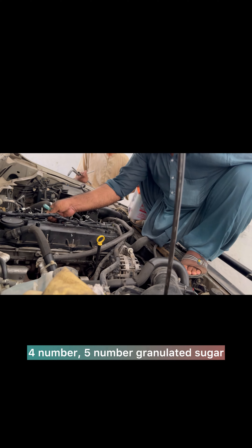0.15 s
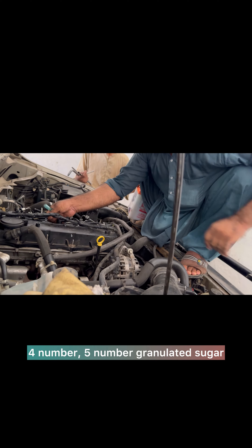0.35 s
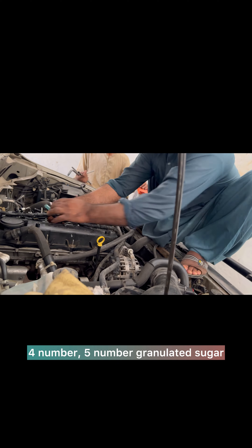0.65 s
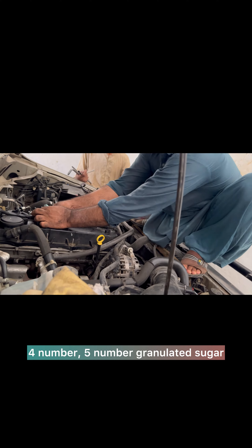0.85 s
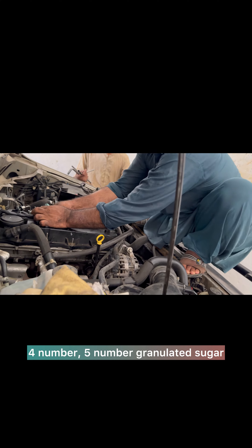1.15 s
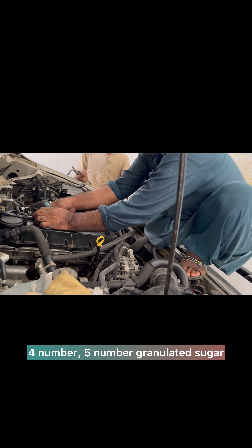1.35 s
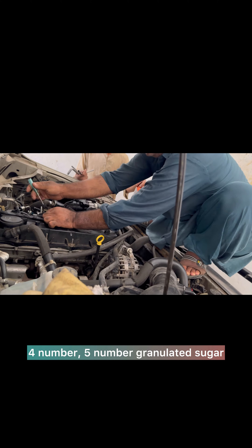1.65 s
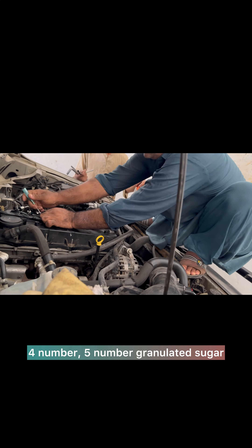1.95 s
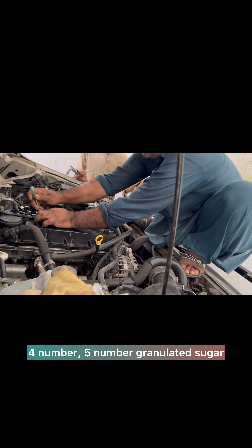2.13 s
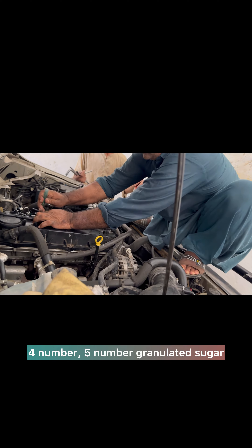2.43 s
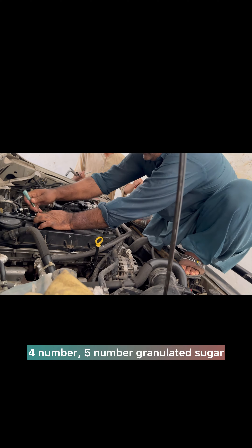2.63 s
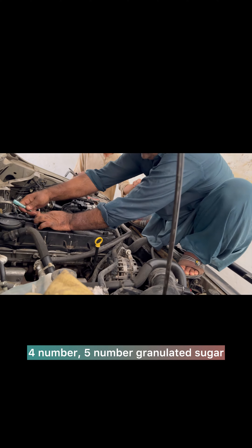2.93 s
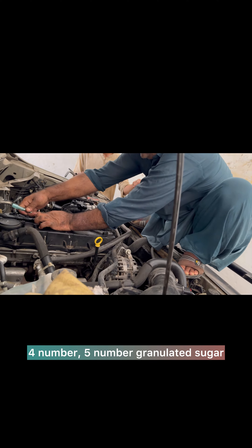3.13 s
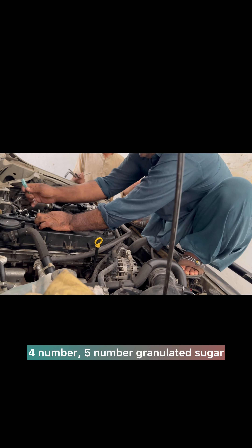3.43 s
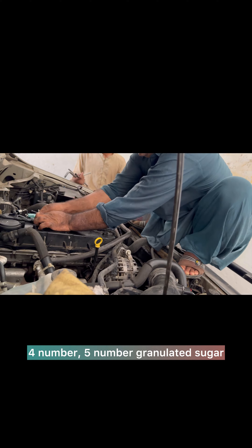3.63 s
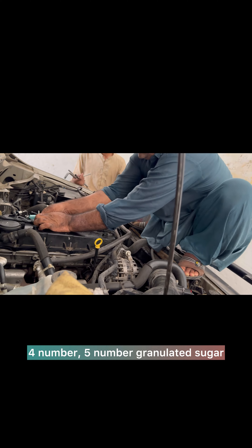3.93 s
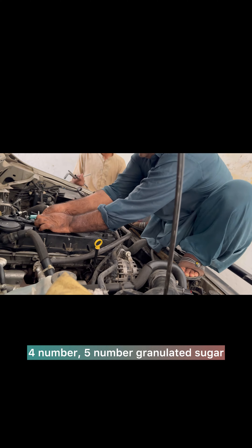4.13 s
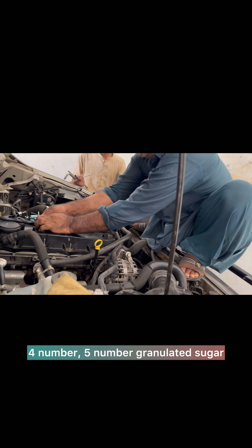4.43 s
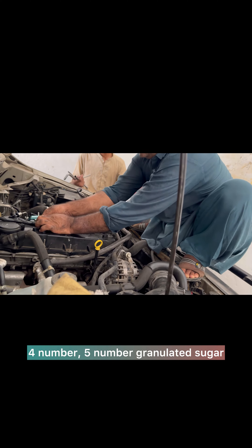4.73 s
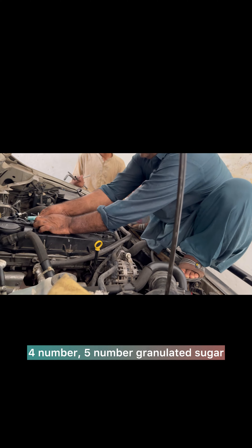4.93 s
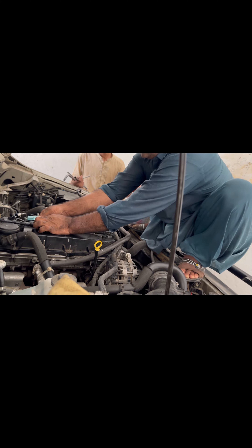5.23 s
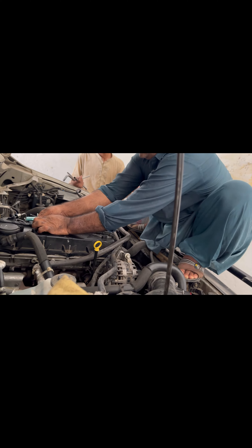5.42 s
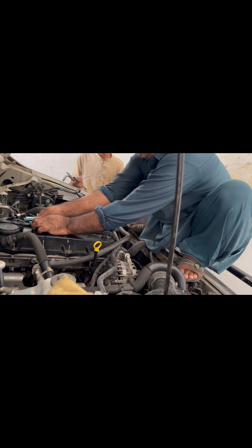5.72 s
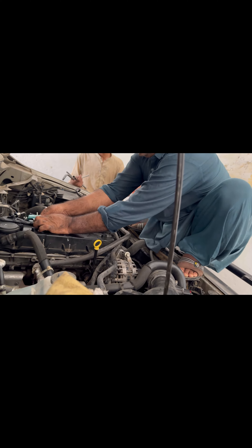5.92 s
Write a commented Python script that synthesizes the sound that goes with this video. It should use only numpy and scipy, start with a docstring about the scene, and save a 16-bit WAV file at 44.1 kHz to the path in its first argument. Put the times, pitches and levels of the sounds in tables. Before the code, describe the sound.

A diesel engine idles with a limping, uneven clatter close by, metal knocks and valve ticks over a low exhaust throb and steady fan roar.

```python
"""Under an open bonnet, close to a small stereo microphone, a diesel engine idles.
Five blows in each crank turn ring its metal parts; the last is the heaviest, so the idle limps,
and a valve ticks loudest in the blow before it. Exhaust puffs give the low throb, fan and intake roar,
gears tap much alike from turn to turn, belt-driven tones hum on their own pitches and a low hoot comes and goes."""
import sys
import numpy as np
from scipy import signal
from scipy.fft import rfft, irfft, next_fast_len
from scipy.io import wavfile
from scipy.ndimage import uniform_filter1d

SR = 44100
rng = np.random.default_rng(int(sys.argv[2]) if len(sys.argv) > 2 else 0)


def wav_record(signal):
    """Record a signal, one row per channel, as 16-bit PCM in the file named by sys.argv[1]."""
    frames = np.transpose(np.atleast_2d(signal))
    bounded = np.clip(frames, -1, 1)
    # unit amplitude maps onto the largest positive 16-bit level
    quanta = np.round(bounded * 32767).astype(np.int16)
    wavfile.write(sys.argv[1], SR, quanta)


def gain_from_db(level_db):
    """Convert decibel levels to linear amplitude factors (20 dB per decade)."""
    decades = np.asarray(level_db, float) / 20
    return 10 ** decades


N = 267687
TURNS_PER_S = 11.39  # steady crank speed
MAX_TURNS = 71  # enough to cover the whole scene


def read(points, hz, column=1):
    """Reads a curve against pitch, with straight lines on a log pitch scale."""
    table = np.array(points)
    return np.interp(np.log(hz + 1), np.log(table[:, 0] + 1), table[:, column])


def evened(x):
    """Scales to rms 1."""
    return x / np.sqrt(np.mean(abs(x) ** 2))


def add(mix, start_s, sound):
    """Lays a sound into the mix, cut off at its end."""
    part = mix[round(start_s * SR):][:len(sound)]
    part += sound[:len(part)]


def wander(hz):
    """Slow random drift of rms 1: low-passed noise on 40 knots a second, joined by straight lines."""
    knots = rng.standard_normal(round(N / SR * 40) + 82)
    lowpass = signal.butter(1, np.clip(hz / 20, .01, .9))
    smooth = signal.filtfilt(*lowpass, knots)[40:-40]
    return np.interp(np.arange(N), np.linspace(0, N, len(smooth)), evened(smooth))


# how far the crank runs ahead of a steady speed: time_s [s], lead_ms [ms]
CRANK_LEAD = [(0, 8.4), (.22, 3.9), (.39, 2.2), (.57, 1.35), (.92, 1.7), (1.27, 2.1), (1.71, 2.9),
              (2.15, 3.2), (2.41, 3.1), (2.68, 2.4), (3.38, 1.0), (3.99, 1.3), (4.43, 1.1), (4.78, 1.5),
              (5.13, 2.6), (5.57, 4.9), (6.07, 8.7)]


def crank():
    """Turns completed at each sample: a steady speed plus a drifting lead, which bends all engine pitches."""
    t = np.arange(N) / SR
    time_s, lead_ms = np.transpose(CRANK_LEAD)
    return TURNS_PER_S * (t + np.interp(t, time_s, lead_ms) / 1000)


# colour of the fan and intake noise: pitch_hz [Hz], relative_level_db [dB per Hz]
ROAR_COLOUR = [(45, 3.5), (80, 4.5), (130, 7.5), (170, 6), (212, 6.5), (330, 5), (500, 4.5), (800, 3.5),
               (1400, 0.5), (2000, -2), (2600, 2.5), (3100, 0.5), (3600, -3), (4200, -1), (4800, -10),
               (5400, -0.5), (6500, -3), (8500, -4), (10500, -9.5), (15600, -13.5)]


def roar(level_db=-43.5, patchy_db=1.47):
    """Fan and intake noise from many places at once: two unrelated streams, patchy in time and pitch."""
    frames, hz = N // 256 + 7, np.fft.rfftfreq(1024, 1 / SR)
    real_1, imag_1, real_2, imag_2, patches = rng.standard_normal((frames, 513, 5)).T
    patches = uniform_filter1d(patches, size=10, axis=0)
    patches = evened(uniform_filter1d(patches, size=10, axis=1))
    colour = gain_from_db(read(ROAR_COLOUR, hz)[:, None] + patchy_db * patches)
    spectra = np.array([real_1 + 1j * imag_1, real_2 + 1j * imag_2]) * colour
    noise = signal.istft(spectra, nperseg=1024, noverlap=768)[1][:, 512:N + 512]
    return gain_from_db(level_db) * evened(noise)


# colour of the gear, chain and tappet taps: pitch_hz [Hz], relative_level_db [dB per Hz]
RATTLE_COLOUR = [(250, -36), (420, 6.5), (520, 3), (800, 8), (900, 1), (1400, 4.5), (2000, 3.5),
                 (2600, 6.5), (3100, 6.5), (3600, -7), (4300, -5), (5500, -12), (6500, -25)]
# share of the rattle's power that slowly changes its pattern: pitch_hz [Hz], power_share [0-1]
PATTERN_DRIFT = [(800, .1), (1500, .35), (2200, .6), (3000, .85)]


def rattle(turns, patterns=6, size=32768, level_db=-44, taps_per_turn=90, spread_db=4, lag_turns=.13):
    """Gears, chain and tappets: one turn of random taps goes round and round while others fade over it."""
    taps = np.zeros((patterns, 2, size))
    shape = (patterns, 2, taps_per_turn)
    signs = rng.choice([-1, 1], shape)
    strikes = signs * gain_from_db(spread_db * np.minimum(rng.exponential(1, shape), 3))
    # taps crowd in after each blow and thin out towards the next
    blow_place = np.array(BLOWS)[:, 0]
    places = rng.choice(blow_place, shape) + rng.exponential(lag_turns, shape)
    np.put_along_axis(taps, (places % 1 * size).astype(int), strikes, 2)

    hz = np.arange(700) * TURNS_PER_S  # harmonics of one turn
    drift = read(PATTERN_DRIFT, hz)
    share = np.sqrt([1 - drift] + [drift] * (patterns - 1))[:, None]
    loops = irfft(rfft(taps)[..., :len(hz)] * share * gain_from_db(read(RATTLE_COLOUR, hz)), size)

    fading = np.array([wander(.5) for _ in range(patterns - 1)])
    weights = [1, *fading / np.linalg.norm(fading, axis=0)]
    place = turns % 1 * size
    out = np.zeros((2, N))
    for weight, loop in zip(weights, loops):
        for port in range(2):
            out[port] += weight * np.interp(place, np.arange(size), loop[port])
    return gain_from_db(level_db) * evened(out)


def pant(turns, fade_db=0.5, limp_db=1.5):
    """Gain curve with five even swells a turn, on top of one broad swell around the heavy blow."""
    since = (5 * turns - .45) % 1  # share of a beat gone since the last swell
    return gain_from_db(-fade_db * since + limp_db * np.cos(2 * np.pi * (turns - .98)))


# faint low hoots: start_s [s], length_s [s], pitch_hz [Hz], level_db [dB rms]
HOOTS = [(3.096, 0.34, 587, -53), (4.002, 0.25, 578, -54.5), (4.701, 0.28, 592, -52.5),
         (5.556, 0.2, 585, -54)]


def hoots():
    """Faint steady sines that fade in and out."""
    out = np.zeros(N)
    for start_s, length_s, pitch_hz, level_db in HOOTS:
        t = np.arange(0, length_s, 1 / SR)
        tone = np.sin(2 * np.pi * pitch_hz * t) * signal.windows.tukey(len(t), .6)
        add(out, start_s, gain_from_db(level_db) * tone)
    return np.sqrt(2) * out


# belt-driven tones: pitch_hz [Hz at steady speed], level_db [dB rms before its slow waver]
HUMS = [(199.3, -58), (327, -53.5), (420.3, -61), (560.2, -60), (653.7, -59.5), (748, -60), (1873, -58)]


def hums(turns):
    """Belt-driven sines whose pitch follows the engine speed, wavering a little in level and phase."""
    engine_s, out = turns / TURNS_PER_S, np.zeros(N)
    for pitch_hz, level_db in HUMS:
        phase = 2 * np.pi * pitch_hz * engine_s + 0.25 * wander(1.0)
        out += gain_from_db(level_db + 1.2 * wander(1.5)) * np.sin(phase)
    return np.sqrt(2) * out


# lines of the exhaust throb: multiple [of the crank rate], level_db [dB rms before its slow waver]
THROB_LINES = [(4, -79), (5, -46.5), (6, -64.5), (9, -61.5), (10, -63), (11, -80), (12, -72.5), (13, -61),
               (14, -64.5), (15, -50), (16, -54), (17, -69), (20, -55), (21, -59.5), (22, -69), (23, -85),
               (24, -59.5), (26, -59), (27, -77), (28, -61.5), (29, -75.5), (30, -53.5), (31, -56),
               (32, -76), (33, -57.5), (34, -72.5), (35, -64.5), (36, -66), (39, -74), (44, -64.5),
               (47, -60), (62, -74), (68, -68.5), (72, -59), (73, -70.5), (83, -63.5), (92, -74.5),
               (96, -57.5), (99, -61.5)]
# uneven exhaust puffs in one turn, which set how the lines start:
# place_turns [turns], strength_db [dB at multiple 16], brightness_db [dB per octave]
PUFFS = [(0.0, -5.1, 12), (.188, .6, 5.2), (.407, -7.4, 5.3), (.448, -.5, -1.6), (.776, 3.5, 2.9),
         (.864, .6, -3.8)]


def throb(turns, waver_db=0.12):
    """Exhaust: sines at multiples of the crank rate, lined up in phase as the uneven puffs set them."""
    place_turns, strength_db, brightness_db = np.transpose(PUFFS)
    out = np.zeros(N)
    for multiple, level_db in THROB_LINES:
        puffs = gain_from_db(strength_db + brightness_db * np.log2(multiple / 16))
        start = np.angle(np.sum(puffs * np.exp(-2j * np.pi * multiple * place_turns))) - .27
        # higher lines waver more
        level = gain_from_db(level_db + waver_db * np.log(multiple / 2.0) * wander(1.1))
        out += level * np.cos(2 * np.pi * multiple * turns + start)
    return np.sqrt(2) * out


# usual blows of a turn, the heavy one last: place_turns [turns], then base levels [dB] sump_db,
# block_db, head_db, pipes_db, pump_db, valve_db, cover_db, crack_db
BLOWS = [(.112, -41.5, -36, -47.5, -51.5, -62, -49, -37.5, -37.5),
         (.29, -53.5, -50, -43.5, -76, -68, -74, -37, -66),
         (.475, -51, -51.5, -41.5, -55, -53, -45, -39.5, -45.5),
         (.692, -45.5, -44.5, -41.5, -60, -54.5, -41.5, -71, -68),
         (.895, -38.5, -35.5, -39.5, -56.5, -50, -46, -48.5, -52)]
# how much one blow differs from the next, in the same order of parts: spread_db [dB]
BLOW_SPREAD_DB = [1.2, 1.5, 2, 2.5, 2.5, 2.5, 1.2, 2]
# parts ring more or less freely as hands move over the engine:
# time_s [s], block_db [dB], head_db [dB], pipes_db [dB], sump_db [dB]
HANDS = [(0, -6, 1.5, 8, 0), (.45, -3, 8.5, 12, 4.5), (.75, 0, 0, 4, 2), (1.2, -0.5, 3, 6, 0),
         (1.9, -0.5, 6.5, 3, -1), (2.3, 0, -3.5, 8, 3), (3, -1, 1.5, 5, 3), (3.4, 0.5, 2, 12.5, -1),
         (3.9, -1.5, -9, 8, 3), (4.3, -1.5, -8, 10.5, -2), (4.7, -2.5, -12, 4, 2), (5.25, 1, -11, 2, -4),
         (5.6, -1.5, -11, 2, -4), (6.1, -1.5, -19, 6, -4)]
# hardest knocks in the block: time_s [s], level_db [dB]
KNOCKS = [(.427, -34), (.954, -33.5), (1.217, -34), (1.48, -32.5), (1.567, -32), (1.919, -32.5),
          (2.709, -31.5), (2.974, -30.5), (3.149, -31.5), (3.413, -33), (3.677, -32), (4.203, -34),
          (4.73, -34.5), (5.081, -36), (5.256, -32.5), (5.953, -33)]
# loudest clinks of the pump: time_s [s], level_db [dB]
CLINKS = [(.25, -44), (.604, -45), (1.042, -44), (1.393, -40), (1.48, -41), (1.919, -43), (2.622, -39.5),
          (2.974, -45), (3.326, -42), (3.852, -41), (3.94, -45), (4.203, -41), (4.38, -44), (4.643, -38),
          (5.517, -41), (5.953, -42)]
# loudest valve ticks: time_s [s], level_db [dB]
TICKS = [(.053, -33.5), (.32, -36), (.409, -36.5), (.497, -37), (.586, -35.5), (.849, -37), (1.375, -35),
         (1.813, -36), (2.252, -33), (3.395, -31.5), (3.483, -34), (3.834, -35), (4.712, -38),
         (5.238, -35.5), (5.586, -36), (5.848, -37)]


def strengths(turns, light_head_share=0.35):
    """One row per blow: its moment, which of the five it is, and how hard it hits each part."""
    place = np.arange(MAX_TURNS)[:, None] + np.array(BLOWS)[:, 0]
    moments = np.interp(place, turns, np.arange(N) / SR, -1, -1).ravel()  # -1 marks blows outside the scene
    which = np.tile(np.arange(len(BLOWS)), len(place))
    luck = rng.standard_normal((len(moments), len(BLOW_SPREAD_DB)))
    levels = np.array(BLOWS)[which, 1:] + BLOW_SPREAD_DB * luck

    time_s, block_db, head_db, pipes_db, sump_db = np.transpose(HANDS)
    head_share = np.where(which == which.max(), 1, light_head_share)
    levels[:, 0] += np.interp(moments, time_s, sump_db)
    levels[:, 1] += np.interp(moments, time_s, block_db)
    levels[:, 2] += np.interp(moments, time_s, head_db) * head_share
    levels[:, 3] += np.interp(moments, time_s, pipes_db)
    # the strongest hits set the level of the nearest blow
    for part, table in ((1, KNOCKS), (4, CLINKS), (5, TICKS)):
        for time_s, level_db in table:
            levels[np.argmin(abs(moments - time_s)), part] = level_db
    inside = moments > 0
    return moments[inside], which[inside], levels[inside]


# ringing modes, one list each for sump, block, head, pipes, pump, valve and cover:
# pitch_hz [Hz], level_db [dB relative to the part], t60_s [s]
RINGS = [
    [(1016, -10, 0.069), (1047, -7.5, 0.05), (1089, -4.5, 0.08), (1140, -17, 0.027)],
    [(1655, -9, .035), (1717, -5, .07), (1767, -5.5, .065), (1814, -7.5, .055), (1873, -5, .085),
     (1960, -13, .025), (2324, -4, .025)],
    [(2500, -16.5, 0.036), (2700, -16.5, 0.034), (2760, -4, 0.1), (2803, -5, 0.06), (2944, -13.5, 0.07),
     (3140, -12.5, .04), (3104, -13.5, 0.053)],
    [(4283, -3, 0.097), (4910, 2.5, 0.012)],
    [(5450, -2, 0.045), (5646, 2.5, 0.06), (5610, 3.5, 0.043)],
    [(6900, -16, 0.015), (7316, -7, 0.053), (7380, 7, 0.011)],
    [(1347, -10, 0.07), (1415, -11, 0.032), (1487, -1.5, 0.043)],
]


def blows(turns, mode_spread_db=1.0, detune=.006, rise_cycles=5.7, crack_s=0.0072, fresh=0.28,
          slip_s=.00002, gather_s=.0025, creep_s=.00003, light_smear=0.3, heavy_smear=0.28):
    """Each blow rings decaying modes of every part plus a noise crack, much alike at each place in the turn."""
    hz, db, t60 = (column[:, None] for column in np.concatenate(RINGS).T)
    part = np.repeat(np.arange(len(RINGS)), [len(modes) for modes in RINGS])
    t = np.arange(3500) / SR
    # twelve sets of slightly different pitches; the higher modes vary most
    pitches = hz * (1 + detune * (hz / 5000) ** 2 * rng.standard_normal((12, len(hz), 1)))
    envelope = gain_from_db(db - 60 * t / t60) * (1 - np.exp(-t * hz / rise_cycles))
    banks = envelope * np.exp(2j * np.pi * pitches * t)

    # usual start of each mode, in cycles; the heavy blow scatters them slightly less
    habit = rng.random((len(BLOWS), len(hz))) * light_smear
    habit[-1] *= heavy_smear / light_smear
    habit -= gather_s * hz[:, 0]  # the modes fall into step a moment after the blow
    usual_snap = rng.standard_normal((len(BLOWS), len(t)))
    # from turn to turn the moment at which a blow reaches each part creeps a little
    steps_s = creep_s * rng.standard_normal((MAX_TURNS, len(BLOWS), len(RINGS)))
    creep = np.cumsum(steps_s, axis=0)[..., part] * hz[:, 0]

    ringing, crack = np.zeros((2, N))
    for moment, which, levels in zip(*strengths(turns)):
        level_luck, slip_luck = rng.standard_normal((2, len(hz)))
        cycles = habit[which] + creep[int(moment * TURNS_PER_S), which] + slip_s * hz[:, 0] * slip_luck
        strike = gain_from_db(levels[part] + mode_spread_db * level_luck) * np.exp(2j * np.pi * cycles)
        add(ringing, moment, (strike @ banks[rng.integers(len(banks))]).imag)
        snap = fresh * rng.standard_normal(len(t)) + np.sqrt(1 - fresh ** 2) * usual_snap[which]
        add(crack, moment, gain_from_db(levels[-1]) * np.exp(-t / crack_s) * snap)
    crack_band = signal.butter(2, [1300, 4800], "bandpass", fs=SR, output="sos")
    return ringing + signal.sosfilt(crack_band, crack)


def scattered(x, t60=0.071):
    """The same sound by way of the bonnet and engine bay: a short dense noise tail."""
    t = np.arange(2000) / SR
    tail = rng.standard_normal(len(t)) * gain_from_db(-60 * t / t60)
    return signal.oaconvolve(x, tail / np.linalg.norm(tail))[:N]


# the two microphone ports: pitch_hz [Hz], likeness [0-1], left_lead_rad [radians]
PORTS = [(40, 1, 0), (62, .999, 0), (85, .987, 0), (200, .99, -.03), (330, .975, -.12), (500, .7, -.5),
         (800, .57, -.48), (1400, .76, -.1), (2000, .9, 0), (2600, .28, -.1), (3100, .25, .5),
         (3600, .5, .2), (4700, .4, .3), (6500, .7, -1), (8500, .75, -1.7), (10300, .8, -2.7)]
# high treble, where the ports swing against each other: pitch_hz [Hz], likeness [0-1], left_lead_rad [radians]
OPPOSED_PORTS = [(10900, .9, -2.9), (11150, .999, -3.14), (13650, .999, -3.14), (13900, .6, -4.1),
                 (15700, .5, -4.2)]


def scene():
    """Direct and scattered sound reach the two ports with a likeness and a lag that depend on pitch."""
    turns = crank()
    air = roar() + rattle(turns)
    bass = signal.sosfiltfilt(signal.butter(2, 600, fs=SR, output="sos"), air)
    air = bass + (air - bass) * evened(pant(turns))  # the bass stays even
    tones = throb(turns) + hums(turns) + hoots()
    knocks = blows(turns)

    size = next_fast_len(N + 4096)
    hz = np.fft.rfftfreq(size, 1 / SR)
    ports = PORTS + OPPOSED_PORTS
    likeness = np.clip(read(ports, hz), 0, 1)
    shared = np.sqrt((1 + likeness) / 2) * rfft(knocks + tones + air[0], size)
    # steady tones differ between the ports in phase only
    differing = rfft(scattered(knocks) + air[1], size) - .5j * rfft(tones, size)
    apart = np.sqrt((1 - likeness) / 2) * differing
    lead = np.exp(.5j * read(ports, hz, column=2))  # half the lead to each side
    left = irfft((shared + apart) * lead, size)
    right = irfft((shared - apart) / lead, size)
    return np.array([left, right])[:, :N]


def band_limit(x):
    """A steep low-pass at the top of the band."""
    return signal.sosfilt(signal.butter(12, 16750, fs=SR, output="sos"), x)


def record(dry):
    """Cuts the deep bass and limits the top of the band."""
    low_hz, top_hz = 38, 15750
    thin = signal.sosfilt(signal.butter(3, low_hz, "highpass", fs=SR, output="sos"), dry)
    lowpass = signal.firwin(801, top_hz, window=("kaiser", 9), fs=SR)
    finished = signal.oaconvolve(thin, lowpass[None], "same")
    return band_limit(finished)


dry = scene()
out = record(dry)
wav_record(out)
```